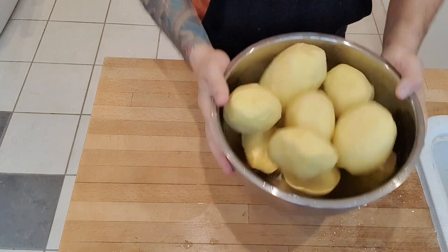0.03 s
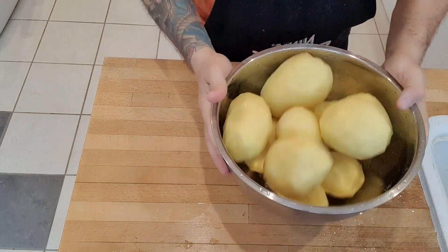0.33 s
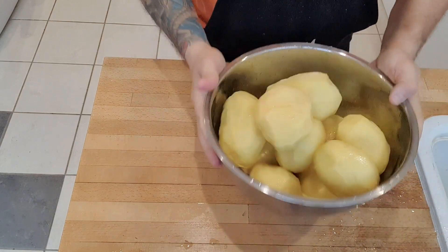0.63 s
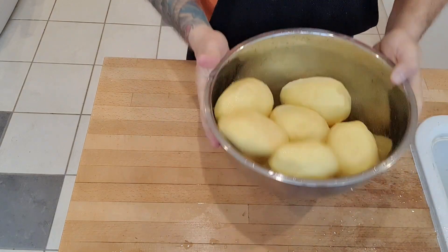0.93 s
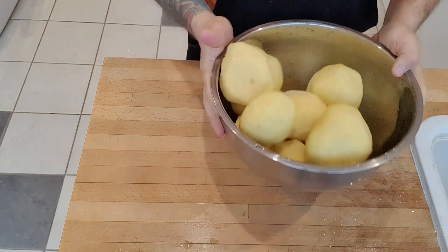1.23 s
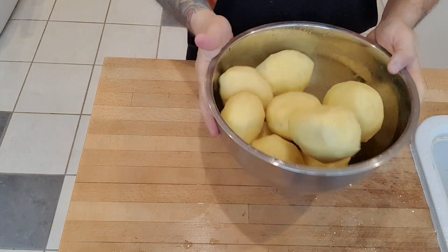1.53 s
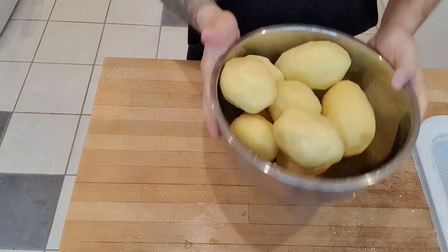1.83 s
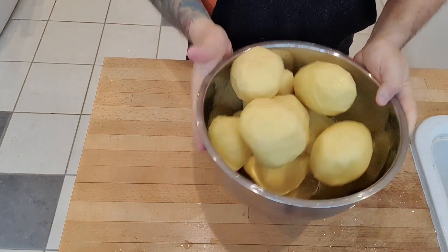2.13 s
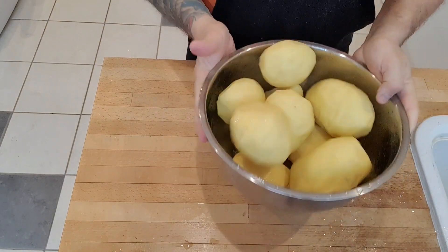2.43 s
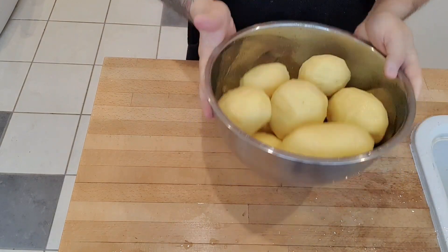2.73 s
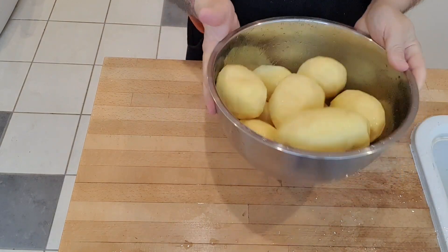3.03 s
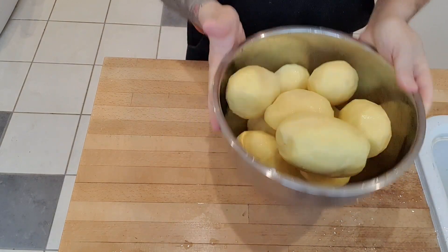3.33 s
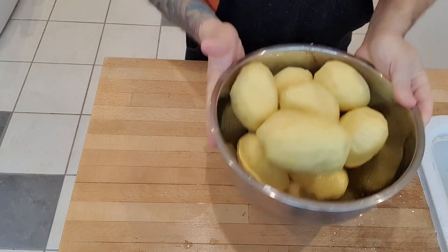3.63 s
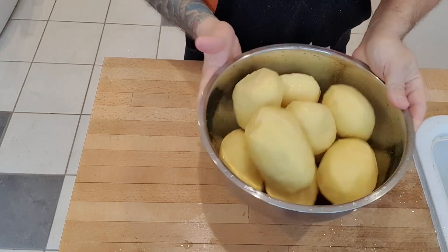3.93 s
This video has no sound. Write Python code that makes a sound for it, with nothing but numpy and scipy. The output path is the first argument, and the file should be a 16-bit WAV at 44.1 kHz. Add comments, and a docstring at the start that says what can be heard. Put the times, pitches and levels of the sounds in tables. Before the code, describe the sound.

In a quiet kitchen, wet peeled potatoes are tossed in a metal bowl near the microphone. Each quick shake brings low thumps, rolling and knocks on the steel, along with sticky slaps and occasional brief rubbing groans.

```python
"""Dull thuds and ringing knocks: peeled potatoes tossed in a hand-held steel bowl, about four shakes a second.
Each shake sets them rolling. Their weight booms on the bottom, their hits ring the wall, and they
judder along the steel in short stick-slip groans. Wet flesh smacks, crackles and squeaks on top.
The worktop and a tiled kitchen answer, over quiet room noise."""
import sys
import numpy as np
from scipy import signal
from scipy.fft import rfft, irfft, next_fast_len
from scipy.io import wavfile

SR = 44100
rng = np.random.default_rng(int(sys.argv[2]) if len(sys.argv) > 2 else 0)


def dump(signal):
    """Clip the signal to [-1, 1] and save it as 16-bit WAV at the path in sys.argv[1]."""
    limited = np.clip(np.atleast_2d(signal).T, -1, 1)
    pcm = np.round(limited * 32767).astype(np.int16)
    wavfile.write(sys.argv[1], SR, pcm)


N = 176400
EVENT_T = np.arange(SR // 4) / SR  # seconds since the start of one contact
GRIP_S = 0.00022  # attack of a groan or squeak

# the surge of rolling from each shake: crest_s, patter_db, crackle_db
SHAKES = [(0.121, -25, -40), (0.401, -26, -39), (.642, -28, -46.5), (0.9, -27, -43), (1.134, -33.5, -45),
          (1.404, -23.5, -39.5), (1.679, -29.5, -47), (1.941, -24, -42.5), (2.217, -29, -46),
          (2.462, -26, -44), (2.728, -23, -44.5), (2.99, -26, -46), (3.248, -27, -44.5),
          (3.482, -27.5, -42), (3.75, -34.5, -46.5), (3.99, -33, -48.5)]


def bottom_thuds():
    """Soft, heavy drops and a rolling rumble ring the bottom; each drop favours the modes of its spot."""
    # a potato drops its weight: start_s, level_db, spot_hz
    thuds = [(.001, -10, 94), (0.115, -24, 132), (.155, -29, 115), (0.303, -17.5, 102), (.398, -17, 194),
             (.438, -8, 162), (.54, -14.5, 95), (.656, -14.5, 194), (0.801, -13.5, 110), (1.068, -7.5, 102),
             (1.196, -15, 105), (1.343, -7, 126), (1.446, -13, 197), (1.61, -10.5, 188), (1.825, -9, 154),
             (1.894, -6.5, 195), (1.932, -15, 109), (2.185, -7.5, 207), (2.231, -11.5, 116),
             (2.374, -13, 113), (2.415, -11, 197), (2.491, -16, 111), (2.568, -11.5, 110),
             (2.696, -11.5, 175), (2.964, -11, 115), (3.211, -7, 187), (3.466, -11, 110), (3.716, -13, 190),
             (3.752, -9, 133)]
    # ring of the loaded bottom: pitch_hz, level_db, t60_s
    modes = [(60, -15, 0.47), (84.6, -8.5, 0.21), (114.6, -3.5, 0.18), (169.4, -9.5, 0.11),
             (189.2, -9.5, 0.18), (232, 0.5, 0.042)]
    spot_width_oct = 0.48
    attack = 1 - np.exp(-EVENT_T / 0.0009)
    track = amp(4) * rolling(modes, bumps_per_s=200)
    for start_s, level_db, spot_hz in thuds:
        spot_modes = [(hz, db - 10 * np.log10(1 + (np.log2(hz / spot_hz) / spot_width_oct) ** 4), t60_s)
                      for hz, db, t60_s in modes]
        add(track, start_s, amp(level_db) * ring(spot_modes) * attack)
    return through(track, lowpass(330, order=3))


def wall_knocks():
    """Knocks and rolling patter ring the steel wall; a longer contact sounds duller."""
    # a potato hits the wall: start_s, level_db, contact_ms
    knocks = [(.146, -9, 0.15), (0.169, -11.5, 0.39), (0.5384, -5.5, 0.35), (0.655, -13, 1),
              (.9, -11, 0.53), (1.061, -10.5, 0.34), (1.142, -12.5, 0.29), (1.337, -21, 0.72),
              (1.35, -12.5, 1), (1.378, -5, 0.22), (1.452, -26, 0.17), (1.581, -21, 0.18),
              (1.615, -14.5, 0.2), (1.826, -11, 0.72), (1.901, -15, 0.43), (2.184, -9.5, 0.12),
              (2.673, -12.5, 0.3), (2.696, -3, 0.42), (2.916, -9.5, 0.34), (2.961, -1.5, 0.55),
              (3.181, -7, 0.22), (3.21, -1, 0.6), (3.434, -14.5, 0.17), (3.47, -17, 0.64),
              (3.723, -15.5, 0.95)]
    # ring of the wall: pitch_hz, level_db, t60_s
    modes = [(380.9, -11.5, 0.41), (432, -8.5, 0.27), (481.4, -2, 0.096), (527.7, -1, 0.12),
             (558.6, 1.5, 0.14), (644.2, 6, 0.038), (863, -7, 0.022), (1001.4, -3.5, 0.04),
             (1128, -29.5, 0.13)]
    track = rolling(modes, bumps_per_s=220)
    for start_s, level_db, contact_ms in knocks:
        knock = through(ring(modes), lowpass(600 / contact_ms, order=2))
        add(track, start_s, amp(level_db) * knock / np.abs(knock).max())
    return track


def ring(modes, spot_spread_db=2.5, load_detune=0.016):
    """Steel struck at a random spot and detuned by the shifting load; peak 1."""
    chance = rng.standard_normal((len(modes), 2))
    tone = np.zeros(len(EVENT_T))
    for (pitch_hz, level_db, t60_s), (spot, load) in zip(modes, chance):
        partial = np.sin(2 * np.pi * pitch_hz * (1 + load_detune * load) * EVENT_T)
        tone += amp(level_db + spot_spread_db * spot) * fade(EVENT_T, t60_s) * partial
    return tone / np.abs(tone).max()


def rolling(modes, bumps_per_s, spots=6):
    """Tumbling potatoes: small bumps at several spots ring the same modes, surging with each shake."""
    crests = [(crest_s, patter_db) for crest_s, patter_db, _ in SHAKES]
    patter = sum(through(contacts(bumps_per_s / spots, spread_db=4), ring(modes)) for _ in range(spots))
    return unit(patter) * surge(crests, rise_s=0.059, fall_s=0.083, rest_db=-41.5)


def surge(crests, rise_s, fall_s, rest_db):
    """Strength of the rolling: it swells quickly with every shake and dies away."""
    t = np.arange(N) / SR
    power = amp(rest_db) ** 2
    for crest_s, level_db in crests:
        age = t - crest_s
        power += amp(level_db) ** 2 * np.exp(-2 * np.where(age < 0, (age / rise_s) ** 2, age / fall_s))
    return np.sqrt(power)


def rubs():
    """Stick-slip judder: the wall's groan, and a click at each slip's edge that grows with pressure."""
    # a potato judders along the steel: start_s, length_s, level_db, slips_per_s
    judders = [(0.019, 0.057, -23, 470), (0.065, 0.027, -17, 572), (0.324, 0.033, -28, 550),
               (0.352, 0.017, -15, 535), (.375, 0.015, -14, 543), (1.376, 0.028, -22, 586),
               (1.412, 0.023, -25, 510), (1.915, 0.047, -21.5, 566), (2.374, 0.048, -27, 535),
               (2.422, 0.029, -20, 545), (2.467, 0.031, -25.5, 560), (2.905, 0.033, -27.5, 557),
               (3.183, 0.02, -23, 560)]
    groan, edges = np.zeros(N), np.zeros(N)
    for start_s, length_s, level_db, slips_per_s in judders:
        cycles = np.cumsum(slips_per_s * (1 + 0.05 * waver())) / SR
        sag_db = 0.9 * np.minimum(EVENT_T / length_s, 2)
        release = fade(np.maximum(EVENT_T - length_s, 0), t60_s=0.045)
        pressure = amp(level_db - sag_db + 1.5 * waver()) * (1 - np.exp(-EVENT_T / GRIP_S)) * release
        slips = np.diff(np.floor(cycles), prepend=0) * uneven(len(EVENT_T), spread_db=6)
        add(groan, start_s, pressure * unit(np.sin(2 * np.pi * cycles)))
        add(edges, start_s, pressure ** 2 * unit(slips) * amp(2))
    return groan, edges


def wet_contact(slip_edges):
    """Slip edges, crackle and smacks, all with the colour of wet flesh."""
    # colour of wet contact: frequency_hz, gain_db
    wet_eq = [(300, -47), (800, 17), (1050, -1), (1280, 13), (1750, 3), (3100, 2), (4800, -2.5), (6400, 0),
              (7200, -11), (8000, -15), (8800, -11.5), (10300, -18), (12000, -11.5), (15500, -24.5)]
    colour = causal(lambda hz: amp(along(wet_eq, hz)))
    track = through(slip_edges, lowpass(3200, order=2)) + sticky_crackle() + smacks()
    return through(track, colour / np.linalg.norm(colour))


def smacks(width_oct=0.44, reference_hz=4720):
    """Wet flesh slaps steel or another potato: a snap, a gritty burst and a fine spray."""
    # wet slaps: start_s, level_db, centre_hz, t60_s
    slaps = [(0.078, -30, 2840, 0.13), (0.124, -22, 3200, 0.1), (0.336, -28.5, 2450, 0.023),
             (0.378, -24.5, 3060, 0.07), (0.5385, -22.5, 5770, 0.0092), (.6, -20, 4500, 0.056),
             (0.862, -26, 5900, 0.051), (1.063, -28, 5860, 0.0038), (1.078, -25, 5700, 0.007),
             (1.346, -24, 9000, 0.024), (1.367, -34, 2200, 0.087), (1.58, -26.5, 8900, .008),
             (1.644, -19.5, 6350, 0.012), (1.826, -29.5, 6200, 0.026), (1.916, -20.5, 6040, 0.012),
             (1.933, -16, 2770, 0.011), (1.947, -22, 3500, 0.011), (2.183, -26.5, 6250, 0.043),
             (2.426, -24.5, 8230, 0.034), (2.492, -30.5, 5200, 0.018), (2.631, -24, 4300, 0.032),
             (2.671, -27, 2200, 0.033), (2.697, -17, 4180, 0.026), (2.701, -29.5, 10000, 0.15),
             (2.914, -29.5, 1820, 0.011), (2.96, -29, 3200, 0.026), (2.981, -23.5, 4640, 0.016),
             (3.18, -25, 1890, 0.09), (3.199, -11, 3940, 0.0094), (3.217, -23, 6100, 0.018),
             (3.435, -23.5, 2800, 0.034), (3.469, -28, 2830, 0.12), (3.711, -21, 5500, 0.0043),
             (3.717, -20.5, 3050, 0.033), (3.74, -21, 3200, 0.0098), (3.983, -23.5, 2930, 0.023)]
    track, size = np.zeros(N), len(EVENT_T)
    for start_s, level_db, centre_hz, t60_s in slaps:
        band = causal(lambda hz: amp(-12) + np.exp(-0.5 * (np.log2((hz + 1) / centre_hz) / width_oct) ** 2))
        pressure = fade(EVENT_T, t60_s) * (1 - np.exp(-EVENT_T / (0.019 * t60_s)))
        burst = contacts(6000, spread_db=3.5, size=size) * pressure * amp(2.5 * waver())
        burst[0] += amp(-6.5) / np.sqrt(t60_s)  # shorter smacks snap harder
        spray = amp(-16) * contacts(1300, spread_db=13, size=size) * fade(EVENT_T, t60_s=0.07)
        brightness = centre_hz / reference_hz
        smack = through(burst, band) / np.sqrt(brightness) + spray * brightness
        add(track, start_s, amp(level_db) * smack)
    return track


def squeaks():
    """Wet skin sticks and lets go: a few milliseconds of very fast, unsteady stick-slip."""
    # pitched slips: start_s, level_db, pitch_hz, t60_s
    chirps = [(.313, -22.5, 983, 0.024), (.665, -18.5, 1494, 0.017), (1.085, -23, 1510, .025),
              (1.097, -25.5, 1990, 0.016)]
    track = np.zeros(N)
    attack = 1 - np.exp(-EVENT_T / GRIP_S)
    for start_s, level_db, pitch_hz, t60_s in chirps:
        cycles = np.cumsum(pitch_hz * (1 + 0.07 * waver())) / SR
        add(track, start_s, amp(level_db) * np.sin(2 * np.pi * cycles) * fade(EVENT_T, t60_s) * attack)
    return track


def sticky_crackle():
    """Dull crackle of the flesh, with bright ticks of the water film at the height of a shake."""
    crests = [(crest_s, crackle_db) for crest_s, _, crackle_db in SHAKES]
    strength = surge(crests, rise_s=0.089, fall_s=0.098, rest_db=-60)
    crackle = through(contacts(1300, spread_db=4), lowpass(3540, order=1))
    highpass = causal(lambda hz: hz / np.hypot(hz, 5900))
    ticks = amp(3) * through(contacts(110, spread_db=4), highpass)
    return (crackle + ticks * strength / strength.max()) * strength


def kitchen(source, near_db, room_db, shift_s=0.16, right_lead_s=0.00008):
    """Direct sound, earlier on the right, plus reflections and a tail that change as the bowl moves."""
    # decay of the tiled room: frequency_hz, t60_s
    room_decay = [(100, 0.76), (500, 0.4), (2000, 0.42), (6000, 0.63), (14000, 0.82)]
    hop = round(shift_s * SR)
    crossfade = np.sin(np.pi * np.arange(2 * hop) / (2 * hop))
    hz, t, noise = signal.stft(rng.standard_normal((2, SR // 2)), SR, nperseg=256)
    decay = fade(t, along(room_decay, hz)[:, None]) * (1 - np.exp(-t / 0.0011))
    padded, reverb = np.pad(source, (hop, 2 * hop)), np.zeros((2, N + 2 * SR))
    for i in range(0, N + hop, hop):
        tail = signal.istft(noise[:, :, rng.permutation(len(t))] * decay, SR, nperseg=256)[1]
        echo = amp(room_db) * tail / np.linalg.norm(tail[0])
        # near reflections off the worktop and the cook's body
        near = rng.standard_normal((2, len(EVENT_T))) * fade(EVENT_T, t60_s=0.051) * (EVENT_T > 0.001)
        echo[:, :len(EVENT_T)] += amp(near_db) * near / np.linalg.norm(near[0])
        grain = padded[i:i + 2 * hop] * crossfade
        answer = signal.fftconvolve(grain[None], echo, axes=1)
        reverb[:, i:i + answer.shape[1]] += answer
    direct = filtered(source, lambda f: np.exp(1j * np.pi * f * right_lead_s * np.array([[-1], [1]])))
    return direct + reverb[:, hop:hop + N]


def room_noise():
    """A steady low hush with a trace of hiss; rms 1."""
    # colour of the hush: frequency_hz, gain_db
    hush_eq = [(20, -22), (45, -11), (120, 0), (400, 1), (2000, -30), (6500, -18.5), (8000, -37),
               (15000, -39)]
    return unit(filtered(rng.standard_normal((2, N)), lambda hz: amp(along(hush_eq, hz))))


def contacts(per_s, spread_db, size=N):
    """Random little impacts of uneven strength; rms 1."""
    hits = rng.random(size) < per_s / SR
    return unit(hits * np.sign(rng.standard_normal(size)) * uneven(size, spread_db))


def uneven(size, spread_db):
    """Random gains scattered around 1."""
    return amp(spread_db * np.clip(rng.standard_normal(size), -2, 2))


def waver():
    """A quick random drift, new every few milliseconds."""
    knots = EVENT_T[::160]
    return np.interp(EVENT_T, knots, rng.standard_normal(len(knots)))


def fade(t, t60_s):
    """Fall by 60 dB in t60_s."""
    return np.exp(-np.log(1000) * t / t60_s)


def amp(db):
    """Decibels to gain."""
    return 10 ** (np.asarray(db) / 20)


def unit(x):
    """Scale to rms 1."""
    return x / np.sqrt(np.mean(x ** 2) + 1e-20)


def along(points, hz):
    """Read a curve of (frequency_hz, value) points on a log axis."""
    frequencies, values = np.transpose(points)
    return np.interp(np.log(hz + 1), np.log(frequencies + 1), values)


def add(track, start_s, x):
    """Mix x into the track at start_s."""
    i = max(0, round(start_s * SR))
    track[i:i + len(x)] += x[:max(0, N - i)]


def filtered(x, response):
    """Shape the spectrum of x by a function of frequency."""
    size = next_fast_len(N + SR // 2)
    return irfft(rfft(x, size) * response(np.fft.rfftfreq(size, 1 / SR)), size)[..., :N]


def causal(gain, size=4096):
    """Minimum-phase impulse response for a gain that depends on frequency."""
    cepstrum = irfft(np.log(np.maximum(gain(np.fft.rfftfreq(size, 1 / SR)), 1e-6)))
    cepstrum[1:size // 2] *= 2
    cepstrum[size // 2 + 1:] = 0
    return irfft(np.exp(rfft(cepstrum)))


def lowpass(cutoff_hz, order):
    """Impulse response that rolls off the treble by 6 dB an octave per order."""
    return causal(lambda hz: 1 / np.sqrt(1 + (hz / cutoff_hz) ** (2 * order)))


def through(x, response):
    """Convolve and keep the length."""
    return signal.fftconvolve(x, response)[:len(x)]


def scene():
    """Thuds close and dry, knocks and groans roomier, wet sounds roomiest, over the hush."""
    groan, slip_edges = rubs()
    hush = room_noise()
    return (amp(-2) * kitchen(bottom_thuds(), near_db=-25, room_db=-29)
            + amp(-1) * kitchen(wall_knocks(), near_db=-11.5, room_db=-6.5)
            + amp(-0.5) * kitchen(groan, near_db=-32, room_db=-3)
            + amp(-2.5) * kitchen(wet_contact(slip_edges) + squeaks(), near_db=3.5, room_db=2.5)
            + amp(-44) * hush)


def record(dry, top_hz=15850):
    """A bright microphone: its colour, the balance of its two ports and its band limit."""
    # microphone colour: frequency_hz, gain_db
    mic_eq = [(20, -18), (40, -9.5), (70, 0), (200, 5.5), (295, -5), (380, 2), (700, 0.5), (1000, 4),
              (1280, -5.5), (1700, 6.5), (15000, 14)]
    # balance of the ports: frequency_hz, left_minus_right_db
    balance = [(60, -6.5), (130, 2.5), (700, 1), (2800, 3.5), (5500, -2), (9000, -4.5)]
    mic = causal(lambda hz: amp(along(mic_eq, hz)))
    pair = np.array([through(channel, mic) for channel in dry])
    return filtered(pair, lambda hz: amp(along(balance, hz) * np.array([[0.5], [-0.5]])) * (hz < top_hz))


dry = scene()
out = record(dry)
dump(out)
```